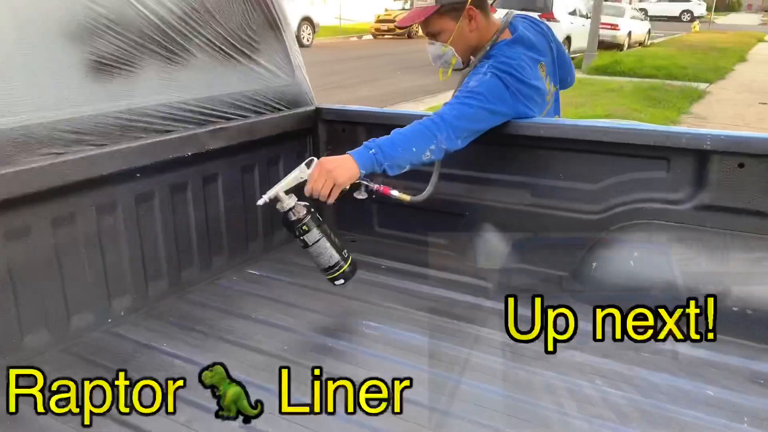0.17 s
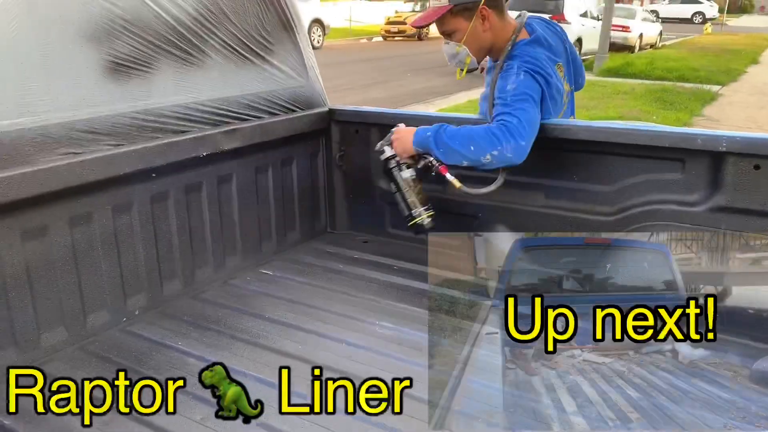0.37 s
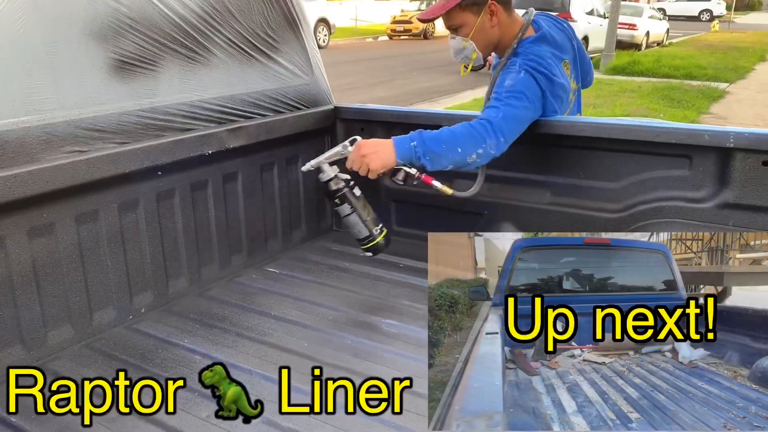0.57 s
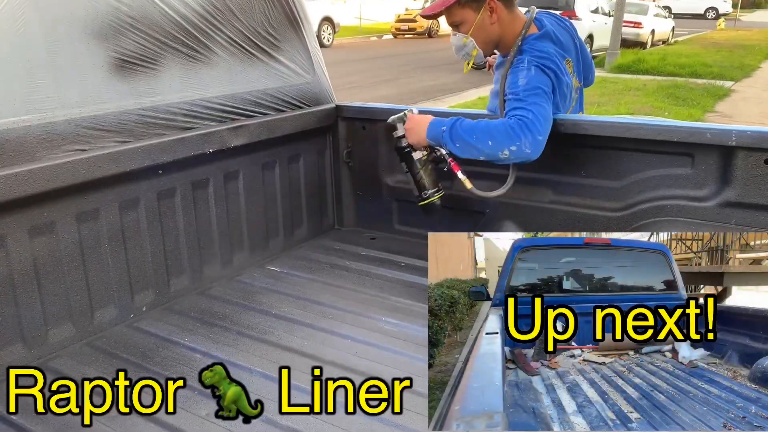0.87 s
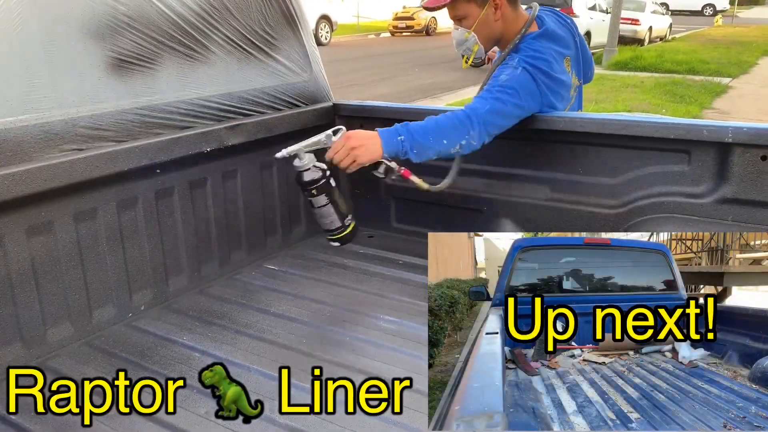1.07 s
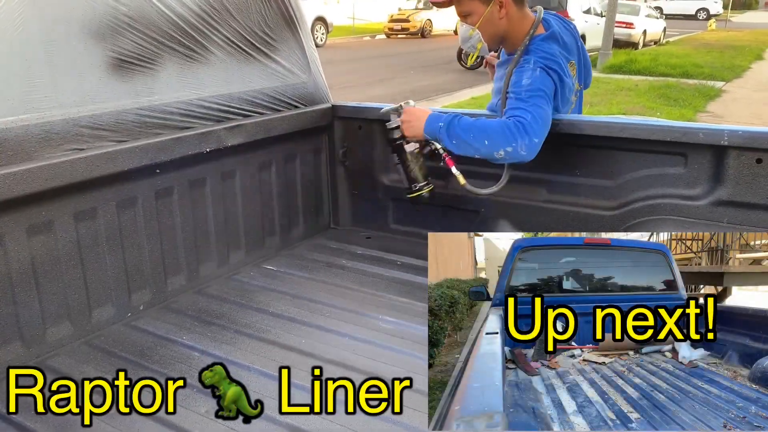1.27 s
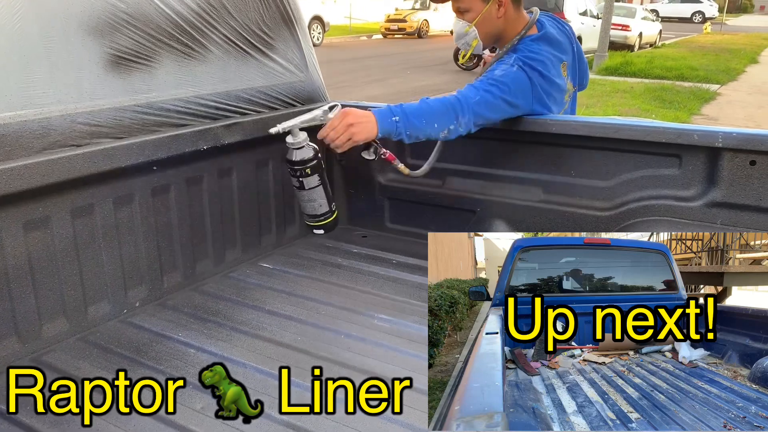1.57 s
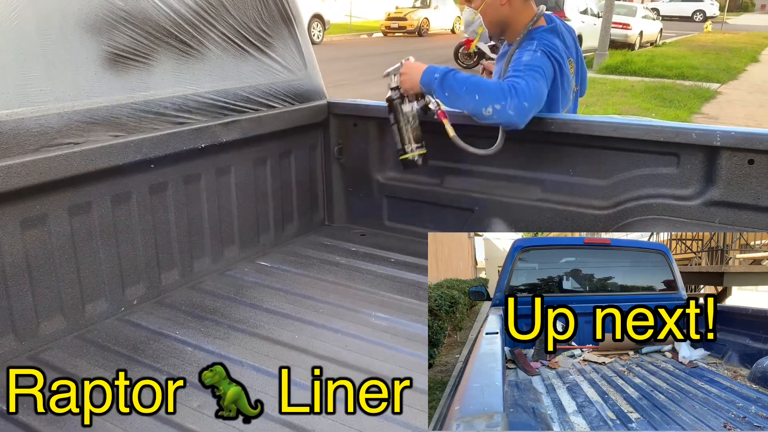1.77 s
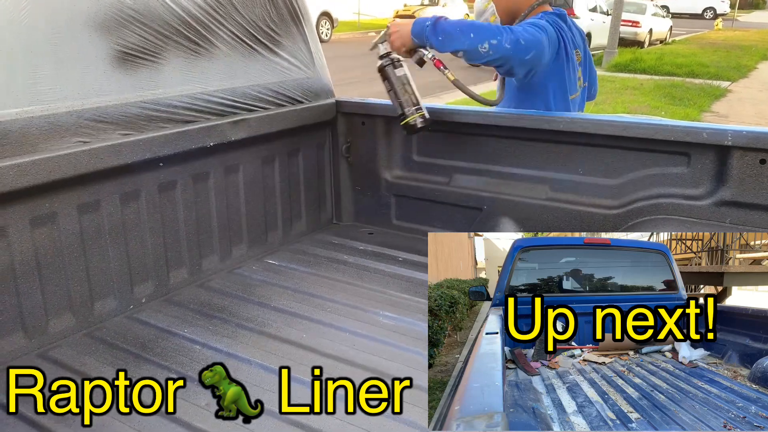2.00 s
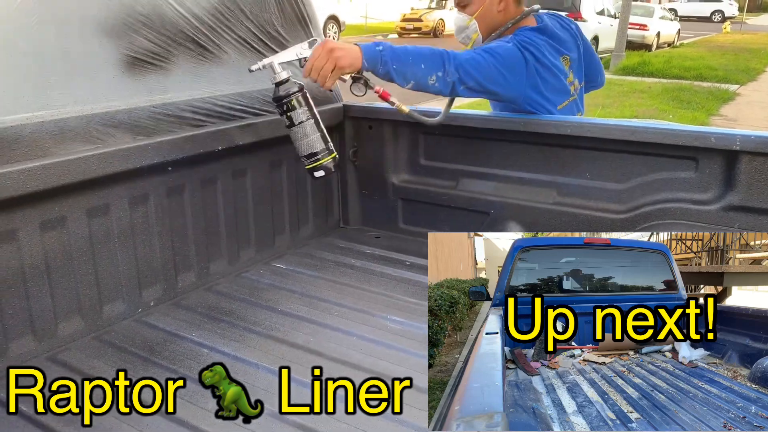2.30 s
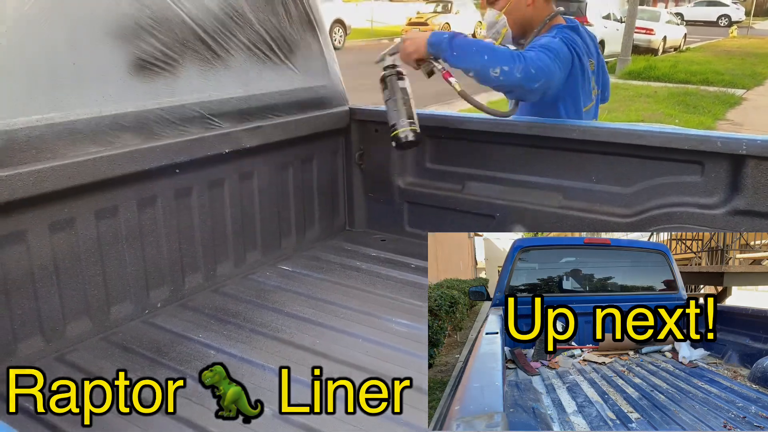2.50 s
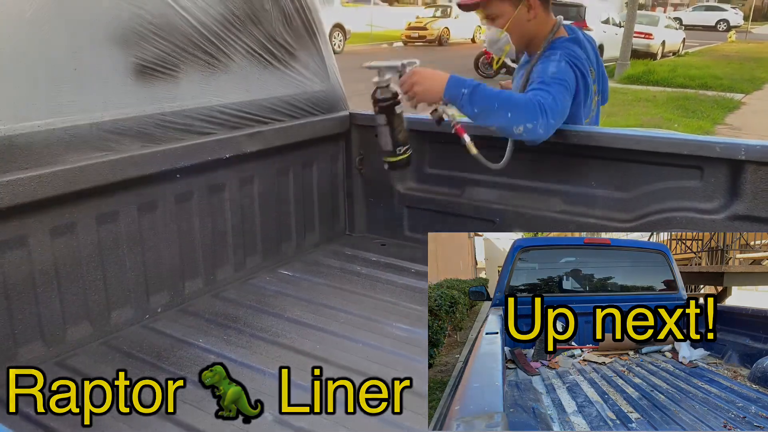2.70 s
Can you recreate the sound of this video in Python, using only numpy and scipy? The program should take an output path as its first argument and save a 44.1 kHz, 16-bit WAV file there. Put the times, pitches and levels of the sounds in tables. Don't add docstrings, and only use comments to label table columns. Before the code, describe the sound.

A paint spray gun fires ten hissing, spitting bursts, each about 0.2 seconds, starting near 0.04 and repeating roughly every 0.23 seconds until 1.87, then at 2.06 and 2.37. Brightness shifts with the sweeping arm; steel adds tight reflections. Between bursts: thin air leak, soft tyre hiss, wind rumble. Dull hose bumps near 0.5, 0.98 and 2.65; a distant engine throbs from 2.7. Close stereo phone pickup outdoors.

```python
import sys
import numpy as np
from scipy import signal
from scipy.fft import rfft, irfft, next_fast_len
from scipy.io import wavfile
from scipy.ndimage import uniform_filter1d, map_coordinates

SR = 44100
rng = np.random.default_rng(int(sys.argv[2]) if len(sys.argv) > 2 else 0)


def wav_record(signal):
    frames = np.transpose(np.atleast_2d(signal))
    bounded = np.clip(frames, -1, 1)
    quanta = np.round(bounded * 32767).astype(np.int16)
    wavfile.write(sys.argv[1], SR, quanta)


def voltage_ratio(level):
    return 10 ** (np.asarray(level, float) / 20)


N = 125685

# [t/s, firing f/Hz, level/dB]
ENGINE = [
    (0, 82, -76),
    (.24, 76, -63.5),
    (.5, 84, -76),
    (1.9, 84, -68.5),
    (2.5, 80.1, -67.5),
    (2.62, 81.9, -75),
    (2.7, 82.8, -59.5),
    (2.78, 84.8, -60),
    (2.85, 88, -61),
]
ENGINE_ORDERS = [0, -8, -15, -24]
# [f/Hz, level/dB]
TYRES = [(250, -37), (450, -8.5), (1000, -2.5), (1500, -6.5), (2100, -25), (3100, -18)]
# [f/Hz, level/dB]
LEAK = [(1800, 7), (2800, -26), (3450, 9.5), (4100, 1), (7300, 1), (11500, 2.7), (14600, 5), (15700, -5.5)]
# [f/Hz, level/dB per Hz]
RUMBLE = [(12, -6), (20, -5), (38, -18), (103, 7), (228, -11.5), (266, -9.5), (375, -25), (420, -18),
          (550, -67), (920, -120)]
# [t/s, level/dB]
GUSTS = [(0, 1.5), (.24, 2), (.4, 4), (.62, -1.5), (.95, 3.5), (1.17, -1), (1.3, -0.5), (1.45, 3.5),
         (1.7, -1), (2.0, 1.8), (2.3, 2.5), (2.5, 0), (2.66, 3.5), (2.72, -3), (2.85, -3)]
# [f/Hz, phase/rad]
STREET_LEAD = [(300, 0.32), (700, -1.2), (1400, -2), (2000, -5), (3400, -5), (5500, -7.5), (7500, -10.5)]
# [f/Hz, likeness/0..1]
STREET_ALIKE = [(60, 1), (300, 0.97), (700, 1), (2000, 0.2), (3500, 0.41), (7000, 0.23)]
# [t/s, level/dB, f/Hz]
BUMPS = [
    (0.506, -50, 294),
    (0.521, -44.5, 311),
    (.98, -50, 288),
    (2.655, -54.5, 290),
]
# [t/s, length/s, level/dB]
PULLS = [
    (0.037, .170, -41),
    (0.263, 0.2, -40),
    (0.483, 0.2, -40),
    (0.732, 0.21, -40),
    (0.965, 0.17, -40),
    (1.186, 0.19, -40),
    (1.418, .181, -41),
    (1.637, 0.23, -40.5),
    (2.064, 0.22, -39.5),
    (2.365, 0.24, -40.5),
]
# [t/s, reach/0 drawn in..1 stretched out]
SWEEP = [(0, .9), (.15, .1), (.36, .1), (.48, .9), (.62, .01), (.7, .01), (.8, .02), (.97, .95), (1.12, .1),
         (1.24, .02), (1.41, .95), (1.6, .4), (1.87, .99), (2.06, .6), (2.2, .5), (2.28, .1), (2.39, .2),
         (2.62, .6)]
# [f/Hz, level/dB per Hz]
JET_IN = [(450, -32.5), (1000, -13), (2400, -4.5), (4000, -1), (7000, 0.5), (12000, 2.9), (14500, 1),
          (15700, -3.5)]
# [f/Hz, level/dB per Hz]
JET_OUT = [(450, -29.5), (1000, -8.5), (2400, -10.5), (4000, -5.5), (7000, 0), (12000, 3.5), (14500, -0.5),
           (15700, -1.5)]
# [f/Hz, phase/rad]
JET_LEAD_IN = [(1550, .1), (1950, 3.05), (2700, 3.2), (3200, 4.7), (4200, 6.2), (4900, 7.2), (5600, 9),
               (7500, 8.6)]
# [f/Hz, phase/rad]
JET_LEAD_OUT = [(1750, .05), (2100, 1.8), (2700, 2.3), (3400, 3.14), (3900, 4.6), (5200, 6.2), (6300, 7.2),
                (7200, 9)]
# [f/Hz, likeness/0..1]
JET_ALIKE_IN = [(1400, .9), (1750, .4), (2100, .97), (2700, .96), (3200, .6), (4200, .75), (5200, .35),
                (7000, .3)]
# [f/Hz, likeness/0..1]
JET_ALIKE_OUT = [(400, .97), (1600, .85), (2100, .45), (2800, .55), (3350, .86), (3800, .45), (5500, .35),
                 (7000, .4)]
# [t/s after the jet, level/dB]
BED_ECHOES = [(.0007, -17), (.0016, -17), (.0029, -18), (.0047, -20), (.008, -22), (.013, -25)]


def unit(x):
    return x / np.sqrt(np.mean(np.abs(x) ** 2) + 1e-20)


def along(points, hz, left=None):
    f, v = np.transpose(points)
    return np.interp(np.log(hz + 1), np.log(f + 1), v, left=left)


def still(points, left=None):
    return lambda hz, t: along(points, hz, left)


def curves(rows, t):
    s, *columns = np.transpose(rows)
    return [np.interp(t, s, column) for column in columns]


def wobble(rate):
    knots = rng.standard_normal(int(N * rate / SR) + 4)
    return map_coordinates(knots, [np.arange(N) * rate / SR])


def pair(colour, lead, alike, patchy_db):
    hz, t, z = signal.stft(rng.standard_normal((2, N)), SR, nperseg=512, noverlap=384)
    hz = hz[:, None]
    patches = uniform_filter1d(rng.standard_normal(z.shape[1:]), 5, 0)
    patches = unit(uniform_filter1d(patches, 12, 1))
    shared = np.clip(alike(hz, t), 0, 1)
    left = z[0]
    right = shared * left * np.exp(-1j * lead(hz, t)) + np.sqrt(1 - shared ** 2) * z[1]
    gain = voltage_ratio(colour(hz, t) + patchy_db * patches)
    ports = signal.istft(gain * np.array([left, right]), SR, nperseg=512, noverlap=384)[1]
    return unit(ports[:, :N])


def engine():
    hz, db = curves(ENGINE, np.arange(N) / SR)
    turn = 2 * np.pi * np.cumsum(hz * (1 + .04 * wobble(40))) / SR
    orders = sum(voltage_ratio(o) * np.cos((k + 1) * turn) for k, o in enumerate(ENGINE_ORDERS))
    return voltage_ratio(db + 1.0 + 3.3 * wobble(30.07)) * orders


def rumble():
    noise = pair(still(RUMBLE), still(STREET_LEAD), still(STREET_ALIKE), patchy_db=0.0)
    lumpy = unit(voltage_ratio(0.5 * wobble(8.97)) * noise)
    return voltage_ratio(-60.5 + curves(GUSTS, np.arange(N) / SR)[0]) * lumpy


def tyres():
    t = np.arange(N) / SR
    colour = still(TYRES + [(5000, -88)], -60)
    hiss = pair(colour, still(STREET_LEAD), still(STREET_ALIKE), patchy_db=3.5)
    return voltage_ratio(-65.5 - 0.3 * (t - t.mean())) * hiss


def leak():
    return voltage_ratio(-68) * pair(still(LEAK, -60), still(STREET_LEAD), still(STREET_ALIKE), patchy_db=1.2)


def hose():
    out, t = np.zeros(N + SR), np.arange(SR // 8) / SR
    t60_s, contact_s = 0.04, 0.0021
    for s, db, hz in BUMPS:
        ring = np.sin(2 * np.pi * hz * t) + 0.53 * np.sin(2 * np.pi * 1.45 * hz * t)
        envelope = voltage_ratio(db - 60 * t / t60_s) * (1 - np.exp(-t / contact_s))
        out[round(s * SR):][:len(t)] += envelope * ring
    return out[:N]


def trigger():
    t, flow = np.arange(N) / SR, np.zeros(N)
    open_s, open_curve, shut_s = 0.0068, 1.2, 0.0022
    vent_db, vent_t60_s = -6.5, 0.058
    start_db, start_s = -0.5, 0.025
    boost_db = 2.5
    for s, length, db in PULLS:
        on, off = t - s, np.maximum(t - s - length, 0)
        opening = np.clip(on / open_s, 0, 1) ** open_curve
        snap = (1 - voltage_ratio(vent_db)) * np.exp(-off / shut_s)
        vent = voltage_ratio(vent_db - 60 * off / vent_t60_s)
        level = voltage_ratio(db + boost_db + start_db * np.exp(-abs(on) / start_s))
        flow += level * opening * (snap + vent)
    return flow


def sweep(drawn_in, stretched, left=None):
    def rule(hz, t):
        reach = np.clip(curves(SWEEP, t)[0], 0, 1)
        return along(drawn_in, hz, left) * (1 - reach) + along(stretched, hz, left) * reach
    return rule


def bed(jet):
    echoes = np.zeros(SR // 20)
    echoes[0] = 1
    for s, db in BED_ECHOES:
        echoes[round(s * SR)] = voltage_ratio(db)
    return signal.fftconvolve(jet, echoes[None] / np.linalg.norm(echoes), axes=1)[:, :N]


def spray(flow):
    jet = pair(sweep(JET_IN, JET_OUT, -90), sweep(JET_LEAD_IN, JET_LEAD_OUT),
               sweep(JET_ALIKE_IN, JET_ALIKE_OUT), patchy_db=1.7)
    spit_db = 1.38 * wobble(430)
    surge_db = 0.6 * wobble(24.63)
    return bed(unit(jet * voltage_ratio(spit_db + surge_db)) * flow)


def scene():
    flow = trigger()
    duck_db, duck_s = -2.2, 0.04
    busy = uniform_filter1d(np.clip(flow / np.median(flow), 0, 1), round(duck_s * SR))
    bass = voltage_ratio(duck_db * busy) * (rumble() + engine())
    return bass + tyres() + leak() + hose() + spray(flow)


def band_limit(x):
    return signal.sosfilt(signal.butter(12, 16290, fs=SR, output="sos"), x)


def record(dry):
    m = next_fast_len(N + 4096)
    hz, (left, right) = np.fft.rfftfreq(m, 1 / SR), rfft(dry, m)
    cross_hz, cross_wide_hz, early_s = 7600, 1700, 9.7 / 44100
    share = .99 * np.clip(.5 + (hz - cross_hz) / cross_wide_hz, 0, 1)
    borrowed = left * np.exp(2j * np.pi * hz * early_s)
    right = np.sqrt(1 - share ** 2) * right + share * borrowed
    top_hz, edge_hz = 15780 + 60, 150
    lowpass = np.clip((top_hz - hz) / edge_hz, 0, 1)
    balance = voltage_ratio([[.2], [-.2]])
    x = irfft(balance * [left, right] * lowpass, m)[:, :N]
    fade_db, fade_s = -4.5, 0.16
    x = x * voltage_ratio(fade_db * np.clip(1 - np.arange(N) / SR / fade_s, 0, 1))
    return band_limit(x)


dry = scene()
out = record(dry)
wav_record(out)
```